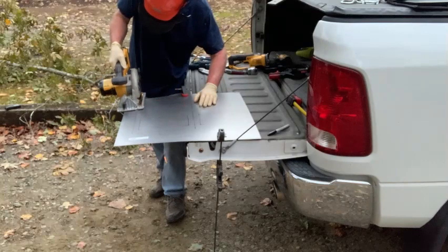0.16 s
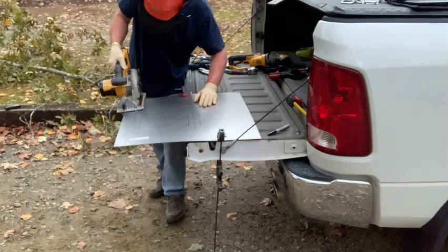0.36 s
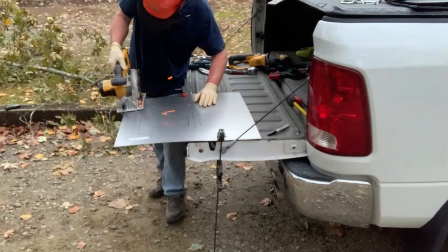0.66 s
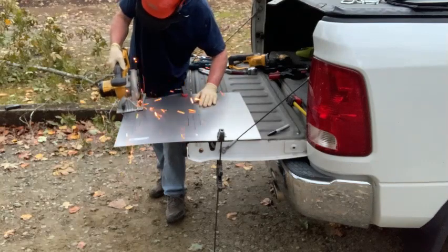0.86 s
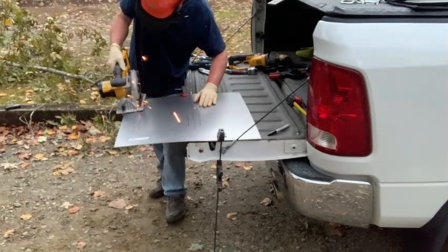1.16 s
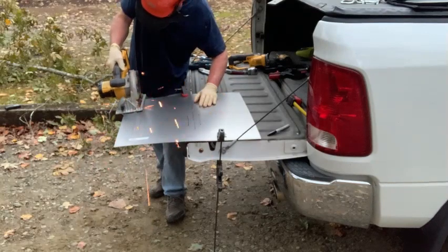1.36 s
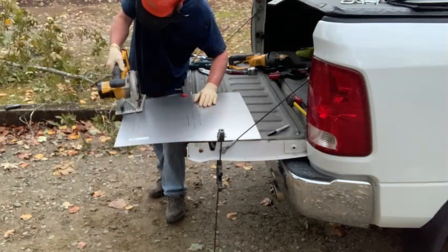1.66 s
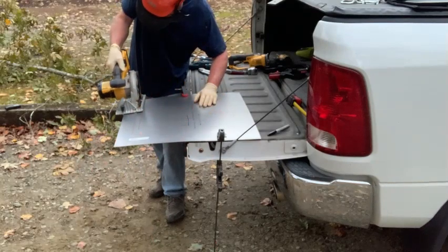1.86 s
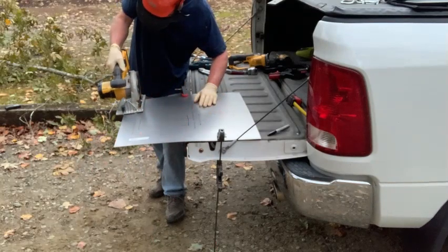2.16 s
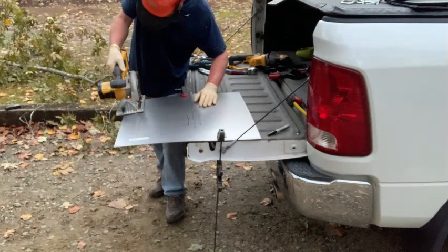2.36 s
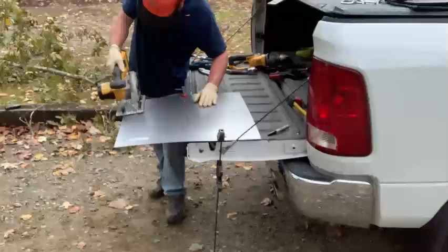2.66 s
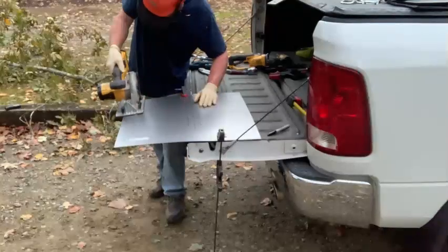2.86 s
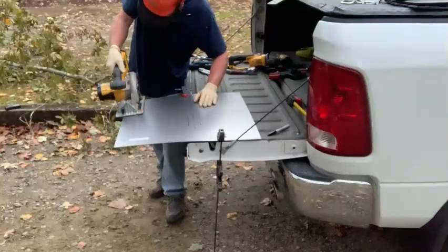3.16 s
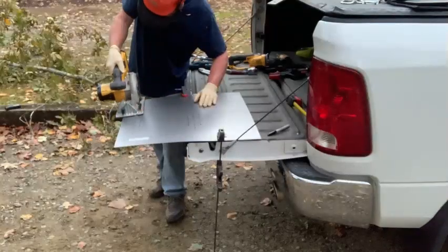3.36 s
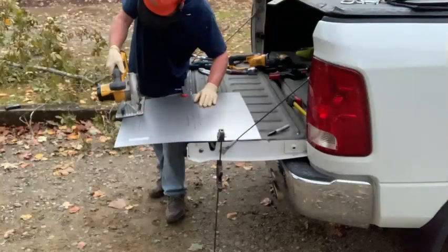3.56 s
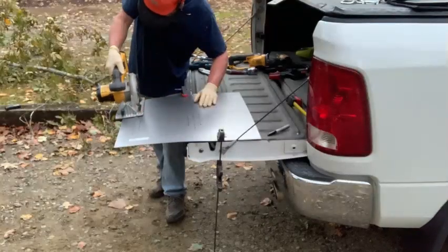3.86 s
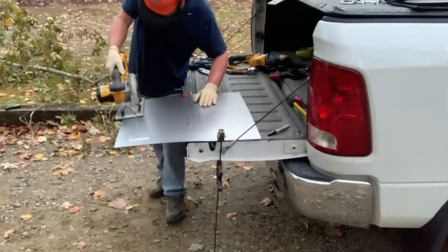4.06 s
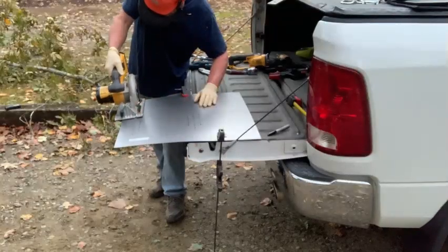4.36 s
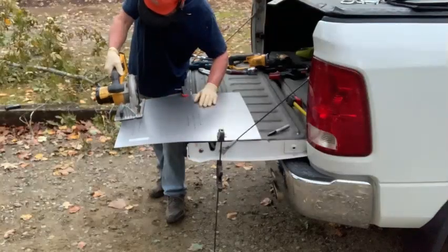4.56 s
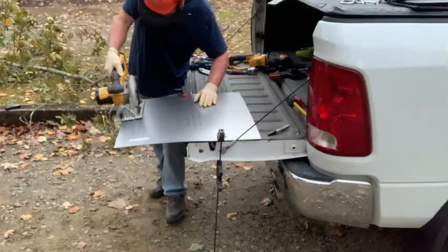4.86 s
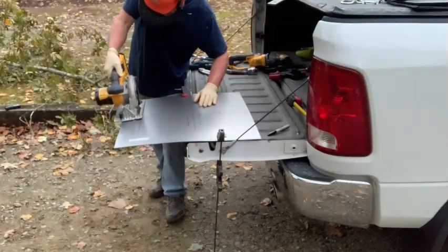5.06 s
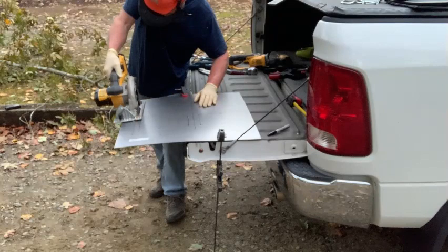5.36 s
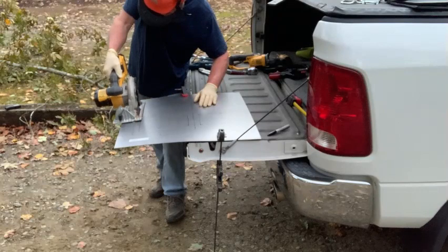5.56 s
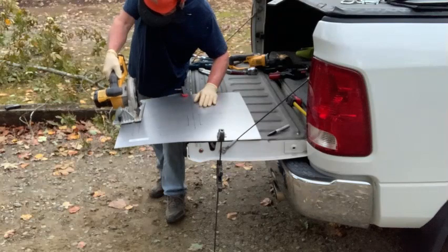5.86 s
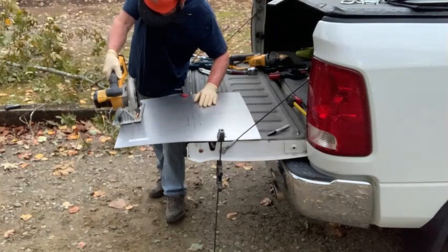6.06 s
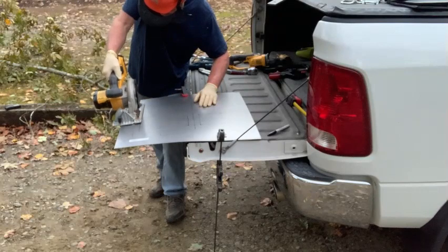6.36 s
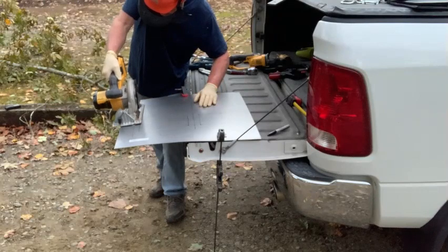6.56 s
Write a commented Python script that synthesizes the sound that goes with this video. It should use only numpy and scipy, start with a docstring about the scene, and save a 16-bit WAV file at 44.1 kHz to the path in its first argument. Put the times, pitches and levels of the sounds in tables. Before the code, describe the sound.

Unbroken harsh screech of a power saw chewing through thin steel, piercing and hissy, its motor and ringing blade slowly sinking in pitch.

```python
"""Circular saw in sheet steel

A hand-held circular saw cuts sheet steel outdoors. Tooth scrape, as uneven noise, rings the spinning blade's modes,
which shift in pitch as the load slows the motor. One low mode sings in short swells; chips hiss; the sheet drones
and rasps as coloured, patchy noise; motor hum and blade thump are sines locked to the shaft.
Between the stereo channels lie a delay, phase shifts and level differences that vary with frequency."""
import sys
import numpy as np
from scipy import signal
from scipy.fft import rfft, irfft, next_fast_len
from scipy.io import wavfile
from scipy.ndimage import uniform_filter1d, map_coordinates

SR = 44100
rng = np.random.default_rng(int(sys.argv[2]) if len(sys.argv) > 2 else 0)


def bounce(signal):
    """Save signal as a 16-bit WAV file at the path given by the first command-line argument."""
    frames = np.transpose(np.atleast_2d(signal))
    limited = np.clip(frames, -1, 1)
    pcm = np.round(limited * 32767).astype(np.int16)
    wavfile.write(sys.argv[1], SR, pcm)


def volts_from_db(level):
    """Convert decibel levels to linear amplitude ratios."""
    exponent = np.asarray(level, float) / 20
    return 10 ** exponent


N = 295911
GEAR = 5.2  # motor turns per blade turn


def unit(x):
    """Scales to unit rms."""
    return x / np.sqrt(np.mean(x ** 2) + 1e-20)


def along(points, hz):
    """Interpolates (f/Hz, value) points on a log frequency axis."""
    f, v = np.transpose(points)
    return np.interp(np.log(hz + 1), np.log(f + 1), v)


def curves(rows):
    """One value per sample for each column after the time."""
    s, *cols = np.transpose(rows)
    return [np.interp(np.arange(N) / SR, s, c) for c in cols]


def wobble(rate_hz, size=N, step_s=1 / SR):
    """Smooth random curve, rate_hz knots per second."""
    knots = rng.standard_normal(int(size * step_s * rate_hz) + 4)
    return map_coordinates(knots, [np.arange(size) * step_s * rate_hz])


def filtered(x, response):
    """Applies a complex response of frequency."""
    m = next_fast_len(N + 8192)
    spectrum = rfft(x, m) * response(np.fft.rfftfreq(m, 1 / SR))
    return irfft(spectrum, m)[..., :N]


# motor under load: t/s, shaft rate/Hz
MOTOR_HZ = [(0, 348), (.45, 346), (.68, 358), (1, 343), (1.7, 330), (2.4, 333), (3, 325), (3.45, 303),
            (3.75, 296), (4.3, 303), (4.75, 289), (5.35, 286), (6.71, 274)]


def motor_speed():
    """Shaft rate in Hz, falling under load."""
    motor_hz, = curves(MOTOR_HZ)
    return motor_hz


# slow part of the hum level: t/s, level/dB
HUM_DB = [(0, -57), (.9, -49.5), (1.05, -56.5), (1.85, -54), (2.15, -76), (2.3, -66), (2.45, -51.5),
          (3.1, -58), (3.6, -50), (4.3, -45), (4.6, -54), (5.1, -60), (5.33, -43), (5.62, -56),
          (6.45, -50.5), (6.71, -52)]


def motor_hum(turns_rad):
    """Sine at the shaft rate, unsteady in level and phase."""
    slow_db, = curves(HUM_DB)
    level_db = slow_db + 3.4 * wobble(6) + 1.27 * wobble(12)
    return volts_from_db(level_db) * np.sin(turns_rad + 0.82 * wobble(14))


# slow part of the untrue blade's thump level: t/s, level/dB
THUMP_DB = [(0, -69), (.86, -67), (1.1, -63.5), (2.17, -73), (2.37, -64.5), (3.9, -71), (4.24, -67),
            (4.7, -78), (5.05, -90), (6.0, -90), (6.55, -72), (6.71, -80)]


def blade_thump(turns_rad, motor_hz):
    """Blade unbalance: sines once and twice per blade turn."""
    TWICE_DB, TWICE_DB_PER_HZ = 3, .16  # second sine re first; fades as the motor slows
    thump_db, = curves(THUMP_DB)
    once = volts_from_db(thump_db + 2.5 * wobble(5)) * np.sin(turns_rad / GEAR + .8 * wobble(6))
    twice_db = thump_db + TWICE_DB + TWICE_DB_PER_HZ * (motor_hz - motor_hz[0])
    twice = volts_from_db(twice_db + 2.5 * wobble(5)) * np.sin(2 * turns_rad / GEAR + .8 * wobble(8))
    return once + twice


def motor(motor_hz):
    """Hum and thump locked to one shaft angle."""
    turns_rad = 2 * np.pi * np.cumsum(motor_hz) / SR
    return motor_hum(turns_rad) + blade_thump(turns_rad, motor_hz)


# feed by hand, before dips and wander: t/s, blade ring/dB, sheet drone/dB, sheet rasp/dB
FEED_DB = [(0, -17.6, -37, -33), (.1, -18.5, -37.5, -28.5), (.25, -16.5, -35, -29.5),
           (.85, -17.5, -34, -30), (1.1, -18.5, -33.5, -30.5), (1.5, -17, -33, -30),
           (1.75, -18, -32.5, -29.5), (1.95, -16, -36.5, -35), (2.3, -15.5, -39, -31.5),
           (2.42, -16.5, -34.5, -32), (2.9, -16.5, -32.5, -29.5), (3.3, -15.5, -34, -29),
           (3.75, -15, -34, -29.5), (4.1, -16.5, -34.5, -30), (4.5, -15, -36, -32), (5.0, -16, -36, -32.5),
           (5.7, -16, -36.5, -32.5), (6.3, -16.5, -37.5, -34.5), (6.71, -16.5, -34.5, -34)]
# brief slackening of the feed: t/s, depth/dB, half width at 1/e/s
SLACK_DIPS = [(.61, 5, 0.1), (1.22, 2.5, 0.077), (1.39, 3.5, .04), (1.62, 1.5, 0.057), (2.2, 1.5, 0.028),
              (6.4, 4, 0.022)]


def cut():
    """Ring, drone and rasp levels in dB: slow feed, slack moments, each layer's own wander."""
    DRONE_FOLLOWS, RASP_FOLLOWS = 0.56, 0.79  # share of a dip reaching the sheet
    t = np.arange(N) / SR
    dip_db = sum(depth_db * np.exp(-((t - s) / width_s) ** 2) for s, depth_db, width_s in SLACK_DIPS)
    ring_db, drone_db, rasp_db = curves(FEED_DB)
    ring_db = ring_db - dip_db + 0.44 * wobble(6.4)
    drone_db = drone_db - DRONE_FOLLOWS * dip_db + 0.51 * wobble(8)
    rasp_db = rasp_db - RASP_FOLLOWS * dip_db + 0.49 * wobble(8)
    return ring_db, drone_db, rasp_db


def chatter(blade_hz):
    """Tooth grip in dB: swells once a turn on the untrue blade and shudders at random."""
    runout = np.sin(2 * np.pi * np.cumsum(blade_hz) / SR + 2.3 * wobble(6))
    shudder_db = 0.77 * wobble(45) + 0.63 * wobble(110)
    slow_db = uniform_filter1d(shudder_db, size=SR // 18)
    return 1.8 * runout + shudder_db - slow_db  # keeps only the fast shudder


def scrape(chatter_db, spike_db):
    """Tooth contacts too dense to count: two independent noises sharing spikes and chatter."""
    spikes = volts_from_db(spike_db * wobble(900))
    return volts_from_db(chatter_db) * spikes * rng.standard_normal((2, N))


def broad(colour, grip_db, patchy_db):
    """Scraping heard through modes too dense to tell apart, in patches that come and go."""
    z = signal.stft(scrape(grip_db, spike_db=0.85), nperseg=512)[2]
    field = rng.standard_normal(z.shape[1:])
    field = uniform_filter1d(field, size=4, axis=0)  # over frequency
    field = uniform_filter1d(field, size=24, axis=1)  # over time
    patched = signal.istft(z * volts_from_db(patchy_db * unit(field)), nperseg=512)[1][:, :N]
    return unit(filtered(patched, lambda hz: volts_from_db(along(colour, hz))))


# drone colour: f/Hz, relative level/dB
DRONE_COLOUR = [(25, -47), (60, -29), (130, -35), (300, -19), (400, -23.5), (480, -20), (580, -16),
                (700, -15.5), (780, -9.5), (860, -14.5), (1100, -10.5), (1500, -5.5), (1750, -5),
                (2050, -15), (3000, -48)]


def sheet_drone(grip_db, drone_db):
    """Low broad resonance of the shaken plate."""
    return volts_from_db(drone_db) * broad(DRONE_COLOUR, 0.79 * grip_db, patchy_db=2.5)


# rasp colour: f/Hz, early relative level/dB, late relative level/dB
RASP_COLOURS = [(1300, -70, -70), (1800, -14, -12), (2050, -10, -7), (2304, 2, 6), (2840, -13, 0),
                (3050, 5, -5), (3200, -2, -12), (3400, -8, 1), (3520, -8, -10), (3620, 2, 1), (4100, 5, 7),
                (4540, 0, 9.5), (4780, 4.5, -5), (4930, -5, 5), (5500, -2, -2), (5900, 3, 3), (6400, 2, 0),
                (7150, -13, -30), (9000, -70, -70)]


def sheet_rasp(grip_db, rasp_db):
    """Higher noise of the shaken plate; its colour changes quickly just after 3 s."""
    early_colour = [(hz, early_db) for hz, early_db, _ in RASP_COLOURS]
    late_colour = [(hz, late_db) for hz, _, late_db in RASP_COLOURS]
    early = broad(early_colour, .5 * grip_db, patchy_db=3.5)
    late = broad(late_colour, .5 * grip_db, patchy_db=3.5)
    fade_rad = np.interp(np.arange(N) / SR, (3.05, 3.1), (0, np.pi / 2))  # equal-power crossfade
    return volts_from_db(rasp_db) * (np.cos(fade_rad) * early + np.sin(fade_rad) * late)


# chip hiss colour: f/Hz, relative level/dB
CHIP_COLOUR = [(3600, -80), (4500, -52), (6000, -17), (7000, -9), (8000, -5.5), (9000, -0.5), (9600, -2),
               (11000, -5), (12000, 0.5), (14000, -7.5), (15300, -3.5), (15550, -50)]


def chips(grip_db):
    """Chip hiss, level relative to the blade's ring."""
    return volts_from_db(-2.5) * broad(CHIP_COLOUR, grip_db, patchy_db=2.5)


# song swells: t of peak/s, peak level before flutter/dB
SONG_PEAKS = [(1.55, -22), (1.81, -26.5), (2.26, -34), (2.35, -29), (2.67, -25), (2.88, -28.5),
              (3.03, -21.5), (3.18, -25), (3.38, -25), (3.55, -27), (3.72, -29), (3.89, -30), (4.15, -32),
              (4.28, -32), (4.47, -29.5), (5.05, -28), (5.17, -21), (5.34, -22), (5.42, -23.5), (5.51, -32),
              (5.77, -24.5), (5.96, -22), (6.2, -30.5), (6.52, -32), (6.71, -32)]


def song(blade_hz):
    """One low mode sings in slow swells and quicker breaks, its pitch sinking slightly as the blade slows."""
    FULL_SPEED_HZ, SHIFT_HZ_PER_HZ = 1890, 2.1  # shift per blade turn/s
    SWELL_DB_PER_S, BREAK_DB_PER_S, REST_DB = 120, 193, -45
    hz = FULL_SPEED_HZ + SHIFT_HZ_PER_HZ * (blade_hz - blade_hz[0])
    t = np.arange(N) / SR
    level_db = np.full(N, float(REST_DB))
    for s, peak_db in SONG_PEAKS:
        fall_db = np.maximum(SWELL_DB_PER_S * (s - t), BREAK_DB_PER_S * (t - s))
        level_db = np.maximum(level_db, peak_db - fall_db)
    phase = 2 * np.pi * np.cumsum(hz) / SR + .7 * wobble(30)
    return volts_from_db(level_db + 1.5 * wobble(25)) * np.sin(phase)


# blade modes: f at full speed/Hz, shift/Hz per blade turn/s (+ forward wave, - backward wave),
# full width at -4.5 dB/Hz, relative level at the four stages/dB (4 columns)
BLADE_MODES = [(1174, 1, 30, -14, -9, -12, -15), (1281, 0, 13, -9, -8, -8, -6),
               (1378, -1, 23, 0, -8, -8, -7), (1486, 1, 24, -2, 2, -3, -3), (1615, -3, 21, -2, -3, -3, -1),
               (2153, -3, 23, -8, -11, -10, -8), (2283, 0, 38, -13, -13, -15, -12),
               (2476, 1, 51, -15, -17, -14, -13), (2573, 4, 18, -1, -10, -9, -3),
               (2627, 1, 31, -12, -15, -13, -8), (2842, -3, 52, -10, -10, -14, -18),
               (2896, -4, 17, -2, -4, -6, -7), (3359, 3, 60, -10, -19, -17, -18),
               (3424, 3, 21, -5, -4, -8, -8), (3758, 4, 60, -5, -13, -19, -18), (3822, 1, 21, 7, 1, -4, -7),
               (3887, 0, 60, -6, -10, -12, -9), (3951, 0, 46, -5, -7, -5, -8),
               (4167, -4, 24, -6, -7, -6, -5), (4393, 3, 27, -4, -5, -7, -4), (4457, 3, 30, 0, -6, -3, -5),
               (4694, -6, 15, 0, -7, -9, -9), (4888, -4, 20, -6, -10, -11, -8),
               (5071, 5, 60, -18, -18, -16, -17), (5297, 4, 14, -7, -3, -7, -8),
               (5502, 6, 14, 0, 2, -1, -2), (5566, 6, 60, -15, -16, -15, -15),
               (5706, -6, 16, -3, -7, -6, -9), (5900, -5, 16, -4, -7, -8, -8),
               (6062, -1, 36, -15, -12, -14, -15), (6438, 4, 23, -8, -10, -11, -10),
               (6643, 7, 23, 0, -5, -6, -1), (6772, -9, 11, 2, -6, -7, -4), (7117, -6, 14, 2, 0, -2, -2),
               (7440, 2, 36, -5, -5, -4, -1), (7849, 10, 30, 2, -2, -1, -1), (7924, 10, 36, -1, -2, -4, -5),
               (8150, 5, 39, -1, -1, -4, -3), (8463, -6, 24, 4, 2, 4, 4), (8742, 9, 24, 0, -2, -2, -2),
               (9076, 7, 37, 5, 3, 3, 5), (9162, 7, 38, 1, 4, 3, 4), (9313, 0, 45, 0, -2, -3, 0),
               (9518, 4, 27, 0, -2, -4, -2), (9798, -3, 60, -2, -6, -4, -1), (9884, -3, 47, 2, -1, 2, 3),
               (9970, -3, 41, -5, -6, 2, 4), (10357, 3, 45, 1, 3, 4, 5), (10487, 1, 41, 1, 4, 0, 1),
               (10864, 9, 25, 1, 5, 7, 6), (11294, -8, 34, 1, 0, 1, -1), (11380, -9, 32, 2, 6, 4, 4),
               (11682, -10, 28, 2, 4, 4, 2), (11886, 14, 30, 3, 3, 4, 6), (12005, 6, 22, 4, 6, 3, 6),
               (12478, 9, 25, 9, 6, 2, 3), (12823, 0, 49, -4, -6, -6, -6), (12920, -13, 28, 9, 6, 5, 7),
               (13297, 10, 60, -7, -8, -6, -4), (13480, 2, 30, -6, -9, -6, -5),
               (13824, 5, 24, -1, 1, -2, 0), (14169, 9, 26, 9, 3, 4, 6), (14556, -13, 36, -4, 1, -1, 0),
               (14696, 15, 37, 5, 1, 0, 5), (14815, -7, 27, 2, 0, -3, 1), (15235, 5, 33, -5, -3, -2, -1),
               (15310, -12, 46, -9, -10, -14, -18)]
# stages at which the mode levels hold, as the kerf grips more of the blade: t/s
STAGES_S = [.4, 2.3, 4.2, 6.1]


def blade(blade_hz, grip_db, sheet_db):
    """Modes are waves running round the disc; spin raises forward waves and lowers backward ones."""
    frames = dict(nperseg=4096, noverlap=3072)
    hz, s, z = signal.stft(scrape(0.81 * grip_db, spike_db=-1.5), SR, **frames)
    t = np.arange(N) / SR
    slowing_hz = np.interp(s, t, blade_hz - blade_hz[0])
    flexing_db = np.interp(s, t, sheet_db - uniform_filter1d(sheet_db, size=2 * SR))
    frame_grid = dict(size=len(s), step_s=s[1])
    power = np.zeros(z.shape[1:])
    for mode_hz, shift, width_hz, *stage_db in BLADE_MODES:
        level_db = np.interp(s, STAGES_S, stage_db)
        level_db += 2.2 * wobble(2.5, **frame_grid) + 1.5 * wobble(9, **frame_grid)
        if mode_hz < 6000:  # low modes swell when the sheet shakes harder than the teeth bite
            level_db += 1.26 * flexing_db
        near = abs(hz - mode_hz) < 700
        off = (hz[near, None] - mode_hz - shift * slowing_hz) / (width_hz / 2)
        power[near] += volts_from_db(level_db) ** 2 / (1 + off ** 2) ** 1.5
    ringing = signal.istft(z * np.sqrt(power), SR, **frames)[1][:, :N]
    return unit(ringing * volts_from_db(0.072 * grip_db))  # the ring swells slightly with the grip


def scene():
    """Row 0 is common to both channels, row 1 an unrelated twin, which makes the channels differ."""
    motor_hz = motor_speed()
    blade_hz = motor_hz / GEAR
    ring_db, drone_db, rasp_db = cut()
    grip_db = chatter(blade_hz)
    tones = (motor(motor_hz) + song(blade_hz)) * [[1], [0]]  # common row only
    sheet = sheet_drone(grip_db, drone_db) + sheet_rasp(grip_db, rasp_db)
    teeth = volts_from_db(ring_db) * (chips(grip_db) + blade(blade_hz, grip_db, rasp_db - ring_db))
    return tones + sheet + teeth


def top_cut(x):
    """Nothing passes above the cut-off."""
    return signal.sosfilt(signal.butter(12, 15670, fs=SR, output="sos"), x)


# right channel's phase lead before the delay: f/Hz, lead/rad
LEAD_RAD = [(0, 0), (250, 1), (350, 1.9), (950, 15.6), (1050, 16.3), (1800, 16.2), (2100, 15.1),
            (2500, 15.6), (3900, 21.6), (4600, 21), (4800, 20), (5350, 20.3), (5700, 19.7), (6250, 21.4),
            (6600, 20.9), (10500, 21.1), (15500, 22.1)]
# left re right: f/Hz, level/dB
LEAN_DB = [(400, -.3), (700, 1.8), (1600, 1.8), (2000, 0), (4500, -.5), (5400, 1), (8000, 1.1),
           (12000, -.3)]
# likeness of the channels: f/Hz, likeness/1
LIKENESS = [(90, 1), (160, .84), (300, .9), (800, .82), (1450, .95), (2000, .85), (2330, .9), (2600, .66),
            (3200, .66), (3700, .9), (4100, .68), (4500, .85), (5500, .7), (6000, .8), (6450, .78),
            (8500, .96), (15000, .94)]


def record(dry):
    """Stereo spread: right channel delayed, both turned in phase and levelled by frequency."""
    DELAY_S = 28 / 44100
    side = np.array([[1], [-1]])  # left, right

    def spread(hz):
        angle = np.arccos(np.clip(along(LIKENESS, hz), 0, 1)) / 2
        return [np.cos(angle), np.sin(angle)]

    def channel_response(hz):
        lead_rad = np.interp(hz, *np.transpose(LEAD_RAD)) - 2 * np.pi * hz * DELAY_S
        gain = volts_from_db(side * along(LEAN_DB, hz) / 2)
        return gain * np.exp(-1j * side * lead_rad / 2)

    common, twin = filtered(dry, spread)
    pair = filtered(common + side * twin, channel_response)
    pair = pair / (1 + abs(pair / .92) ** 10) ** (1 / 10)  # soft clipping of the highest peaks
    return top_cut(pair)


dry = scene()
out = record(dry)
bounce(out)
```